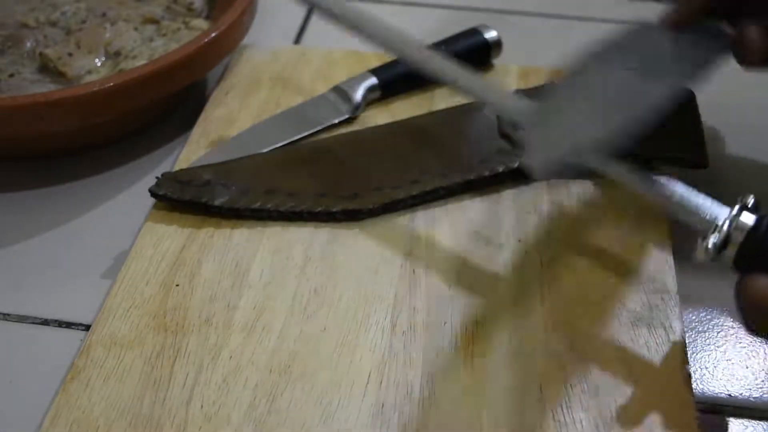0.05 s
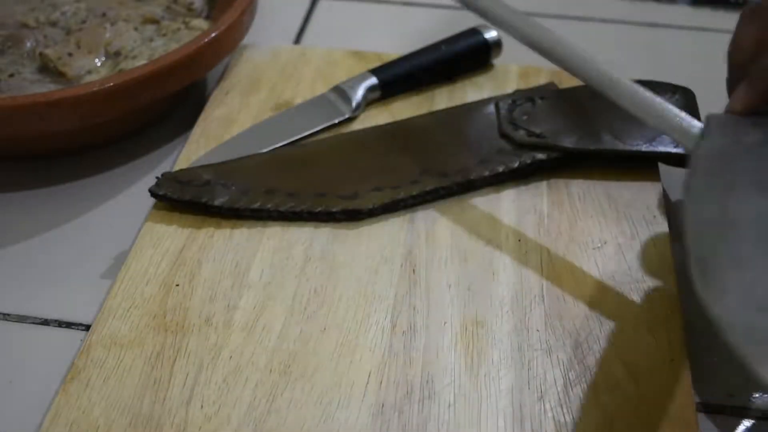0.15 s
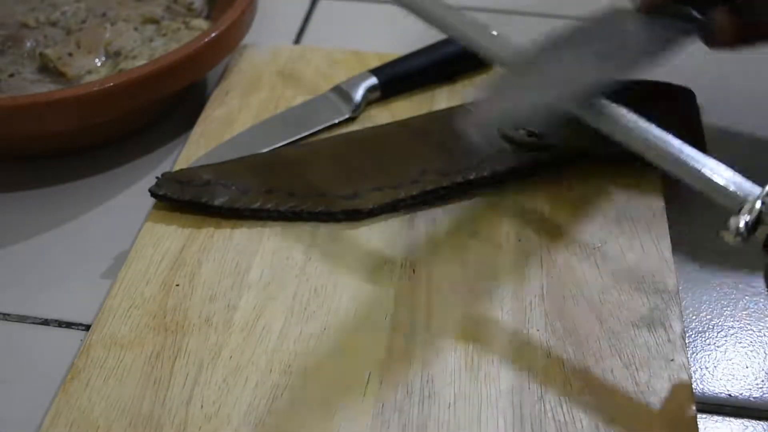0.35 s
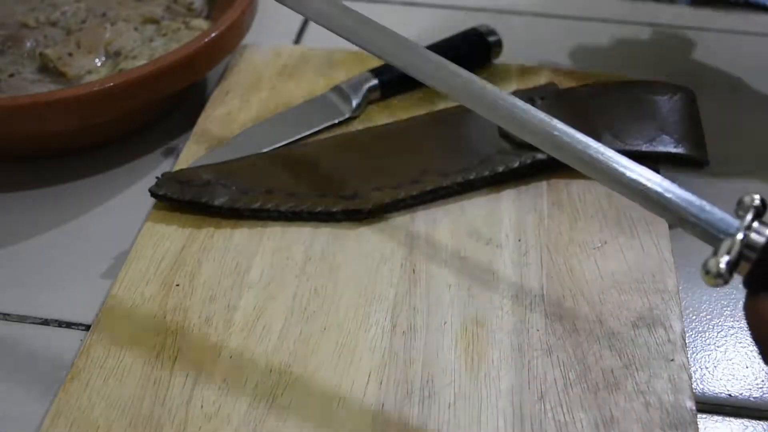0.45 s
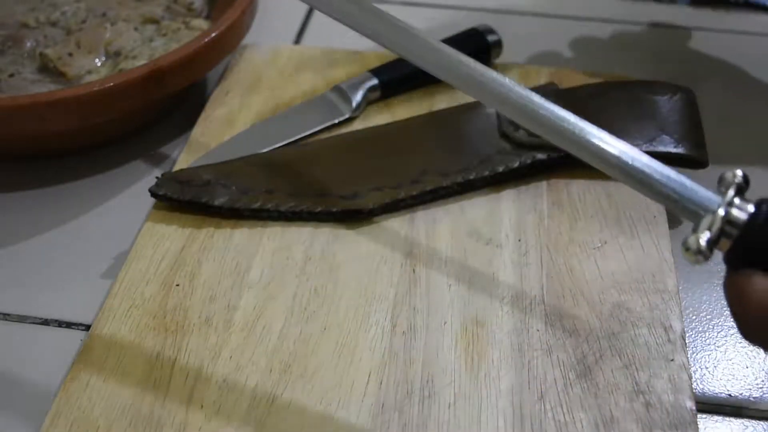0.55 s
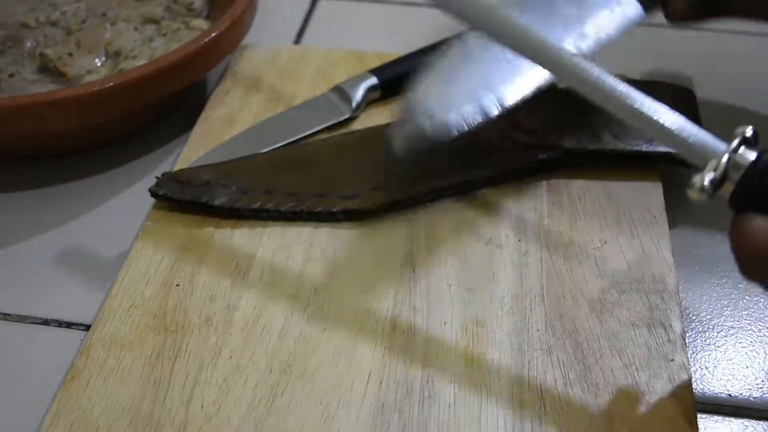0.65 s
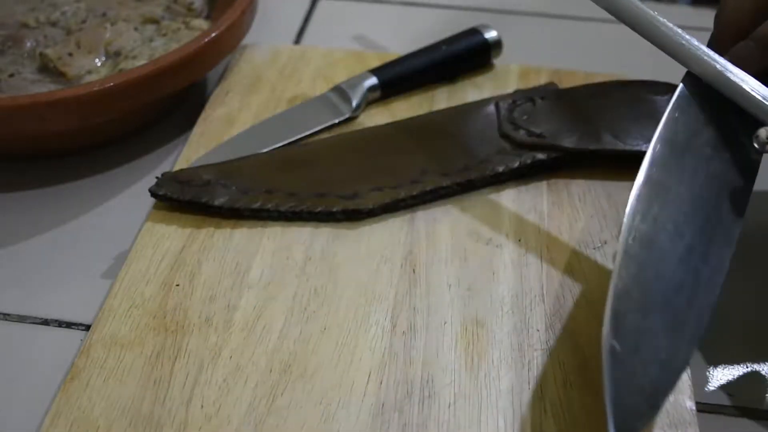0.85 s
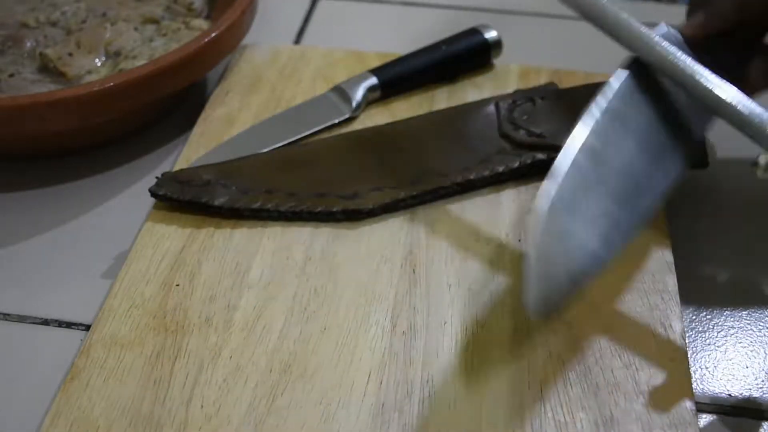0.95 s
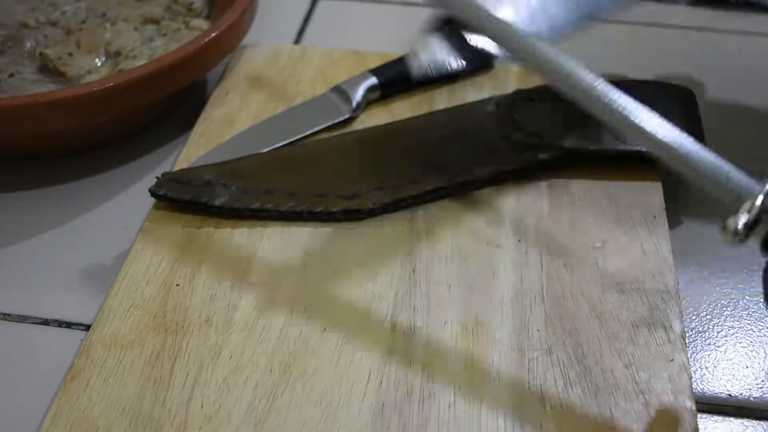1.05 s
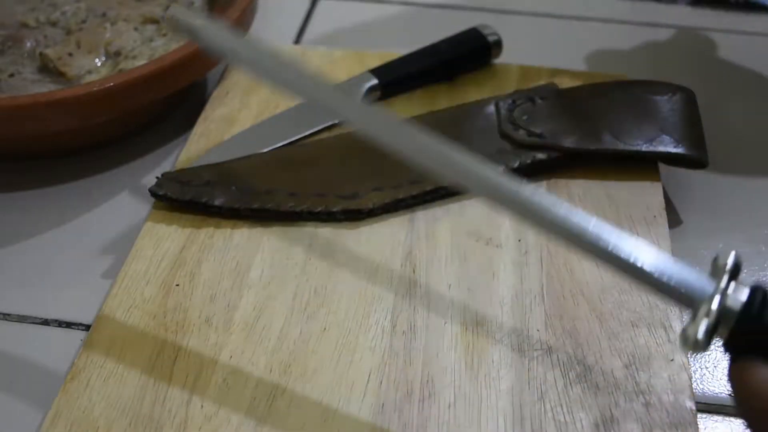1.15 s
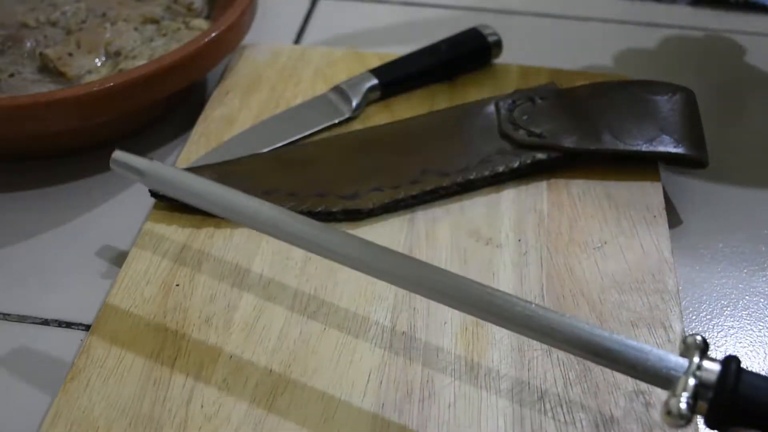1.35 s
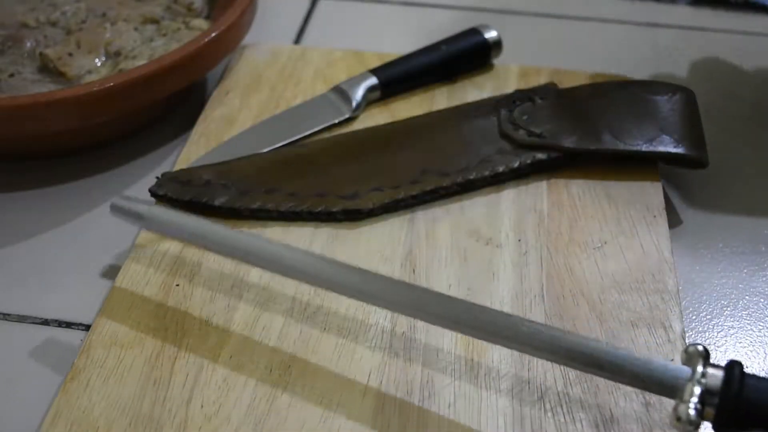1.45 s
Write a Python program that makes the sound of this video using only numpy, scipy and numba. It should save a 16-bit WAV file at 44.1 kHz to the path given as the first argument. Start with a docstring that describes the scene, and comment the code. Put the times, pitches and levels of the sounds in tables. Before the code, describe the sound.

A knife is honed on a steel, close up in a quiet kitchen. An earlier stroke's ring is fading as a clink comes at 0.2 seconds, followed by a loud, gritty metallic scrape until 0.5 and a brief ring. A second clink at 0.9 seconds leads into a lighter scrape, ringing off from about 1.1. Hard walls add a short echo over faint hiss and low hum.

```python
"""A large knife is drawn twice along a honing steel, close up in a quiet kitchen.
Each stroke lands with a clink, then the edge grinds from heel to tip: the resonances of blade and rod
slide as the contact travels. The freed blade rings on briefly, and hard walls echo it.
The harder first stroke overloads and clips. Underneath are hiss, a low drone, the dying tail of an
earlier stroke and a faint tone that swells before the second clink."""
import sys
import numpy as np
from scipy import signal
from scipy.fft import rfft, irfft
from scipy.io import wavfile
from numba import njit

SR = 44100
rng = np.random.default_rng(int(sys.argv[2]) if len(sys.argv) > 2 else 0)


def put_to_file(sound):
    """Save the sound as 16-bit audio at rate SR, in the file named by the first command-line argument."""
    columns = np.atleast_2d(sound).T  # one column per channel
    safe = np.clip(columns, -1, 1)
    whole_steps = np.round(safe * 32767)
    wavfile.write(sys.argv[1], SR, whole_steps.astype(np.int16))


N = 66150
T = np.arange(N) / SR
BIN_HZ = np.arange(N // 2 + 1) * SR / N
MIDDLE, TREBLE, LOW = 0, 1, 2
LOW_BELOW_HZ, TREBLE_ABOVE_HZ = 2500, 8300


def from_db(db):
    """Decibels to gain."""
    return 10 ** (np.asarray(db) / 20)


def rms_one(x):
    """Scale to unit power."""
    return x / np.sqrt(np.mean(x ** 2) + 1e-20)


def at_hz(rows, hz, column=1):
    """Read a table column on a log-frequency axis."""
    rows = np.array(rows)
    return np.interp(np.log(hz + 1e-9), np.log(rows[:, 0]), rows[:, column])


def register(hz):
    """The register a frequency falls in."""
    return LOW if hz < LOW_BELOW_HZ else TREBLE if hz > TREBLE_ABOVE_HZ else MIDDLE


def band(x, low_hz, high_hz):
    """Gentle band-pass."""
    edges = [low_hz, min(high_hz, SR / 2 - 1000)]
    return signal.sosfilt(signal.butter(2, edges, "band", fs=SR, output="sos"), x)


def drift(rate_hz):
    """Smooth random movement with a spread of 1."""
    return rms_one(irfft(rfft(rng.standard_normal(N)) / (1 + (BIN_HZ / rate_hz) ** 2), N))


@njit
def resonate(x, hz, width_hz):
    """A resonance with a moving centre; white noise keeps its power."""
    out, state, decay = np.zeros(len(x)), 0j, np.exp(-np.pi * width_hz / SR)
    for i in range(len(x)):
        state = state * decay * np.exp(2j * np.pi * hz[i] / SR) + x[i]
        out[i] = state.real
    return out * np.sqrt(2 * (1 - decay * decay))


def mode(x, hz, width_hz, skirt=1.102):
    """One resonance with its far skirts trimmed."""
    return band(resonate(x, hz, width_hz), hz.min() / skirt - width_hz, hz.max() * skirt + width_hz)


def wavering_tone(hz, width_hz):
    """Noise narrowed to an unsteady pitch, at unit power."""
    return rms_one(mode(rng.standard_normal(N), np.full(N, float(hz)), width_hz))


# The colour of the room tone. Each row: frequency in Hz, relative level in dB.
HISS_SPECTRUM = [(25, -32.5), (60, -11.5), (110, -5), (160, -7), (250, -5), (380, -12.5), (750, -11.5),
                 (1100, -11.5), (1550, -3.5), (2100, -9), (2600, -19), (3400, -22), (3830, -4), (4400, -24),
                 (5400, -17), (6100, -28.5), (7500, -21.5), (9000, -33), (11000, -36), (16000, -39)]
# The pitches of the drone. Each row: frequency in Hz, width in Hz, level in dB.
DRONE_TONES = [(142.7, 10, -45.5), (185, 6.4, -45.5), (240.6, 12, -52.5)]


def room_tone(hiss_db=-36):
    """A bed of faint, steady hiss and low drone."""
    hiss = rms_one(irfft(rfft(rng.standard_normal(N)) * from_db(at_hz(HISS_SPECTRUM, BIN_HZ)), N))
    drone = sum(from_db(db) * wavering_tone(hz, width) for hz, width, db in DRONE_TONES)
    return from_db(hiss_db) * hiss + drone


def earlier_stroke(sound, sooner_s=0.64, db=-3):
    """A stroke like the first, only sooner, is still dying away as the scene opens."""
    second_touch = STROKES[1][0]
    tail = sound[int(sooner_s * SR):int(second_touch * SR) - 1]
    fade = np.sqrt(np.linspace(1, 0, len(tail)))
    return from_db(db) * np.pad(tail * fade, (0, N - len(tail)))


def grains(per_s=7000, spread_db=3.5):
    """Tiny catches of the edge on the ridges of the steel."""
    sizes = from_db(spread_db * np.minimum(rng.exponential(1, N), 5))
    signs = rng.choice([-1, 1], N)
    return rms_one(sizes * signs * (rng.random(N) < per_s / SR))


# The two strokes. Each row: touch, slide start and tip release in seconds; middle, treble and low
# clink levels in dB; free ring gain below the treble in dB; treble tilt of the scrape in dB per
# octave; free ring gain in the treble in dB.
STROKES = [(.2256, .3, .468, -12, -14, -14, 0, -5, 0), (.8942, .96, 1.13, -19, -11, -9, -9, 5, -20)]


def clinks(hz, width_hz, blow_db=-1, buzz_db=-5, t60=0.075):
    """The heel lands on the rod and drives one mode: a blow, then a quickly dying buzz."""
    out = np.zeros(N)
    blow = from_db(blow_db) * np.sqrt(SR / (2 * np.pi * width_hz))
    for touch, _, _, *clink_db in STROKES:
        push = from_db(buzz_db - 60 * np.maximum(T - touch, 0) / t60) * (T >= touch) * grains()
        push[int(touch * SR)] += rng.choice([-1, 1]) * blow
        out += push * from_db(clink_db[register(hz)])
    return out


def landing_ticks(db=-17, t60=0.054):
    """The broad tick of noise as the heel meets the rod."""
    level = sum(from_db(db - 60 * np.maximum(T - touch, 0) / t60) * (T >= touch) for touch, *_ in STROKES)
    return band(level * rng.standard_normal(N), low_hz=480, high_hz=12000)


def per_stroke(column):
    """One stroke setting, held from each touch to the next."""
    rows = np.array(STROKES)
    return rows[np.maximum(np.searchsorted(rows[:, 0], T) - 1, 0), column]


# The scrape's envelope, one list a stroke. Each row: time in seconds, middle, treble and low level in dB.
SCRAPE_ENVELOPES = [
    [(.226, -71, -60, -42), (.27, -41, -48.5, -36), (.29, -30, -36.5, -35.5), (.32, -21.5, -33.5, -21.5),
     (.338, -23.5, -37, -27), (.35, -11.5, -26, -18), (.392, -7.5, -25, -21), (.42, -8.5, -23, -19),
     (.44, -7, -18.5, -25), (.464, -13.5, -10.5, -34), (.476, -11.5, -17, -39), (.49, -44, -48, -35)],
    [(.895, -42, -45, -34), (.914, -34, -61, -27), (.936, -29.5, -29, -28.5), (.952, -31.5, -38, -28),
     (.98, -31.5, -30, -36), (1.002, -24, -29.5, -27), (1.022, -19, -31, -22.5), (1.044, -14.5, -25, -24.5),
     (1.062, -16, -23.5, -24), (1.096, -14.5, -21.5, -19), (1.112, -12, -16, -27),
     (1.128, -17, -12.5, -28.5), (1.138, -32, -31, -26)],
]
# The edge catches and bites harder. Each row: centre in seconds, length in seconds, boost in dB.
EDGE_BITES = [(.3215, 0.0071, 4.5), (.351, 0.0025, 2.5), (.368, 0.0095, 1), (.384, 0.0048, 2),
              (1.096, 0.015, 1.5)]


def scrape_level(hz, treble_pivot_hz=10500):
    """How hard the edge grinds in this register; bites lift the middle, each stroke tilts the treble."""
    part = register(hz)
    level = np.zeros(N)
    for rows in map(np.array, SCRAPE_ENVELOPES):
        level += from_db(np.interp(T, rows[:, 0], rows[:, 1 + part], left=-np.inf, right=-np.inf))
    if part == MIDDLE:
        bite_db = sum(db * np.exp(-(2 * (T - centre) / length) ** 2) for centre, length, db in EDGE_BITES)
        level *= from_db(bite_db)
    if part == TREBLE:
        db_per_octave = per_stroke(column=7)
        level *= from_db(db_per_octave * np.log2(hz / treble_pivot_hz))
    return level


# The modes of blade and rod pressed together. Each row: pitch at the heel and at the tip in Hz,
# width in Hz, gain at the heel, at the tip and in the clink in dB.
CONTACT_MODES = [(997, 1057, 80, -8, -11, -16.5), (1319, 1350, 100, -8.5, -19, -7.5),
                 (1506, 1804, 98, -5, 0, -5.5), (1850, 2000, 150, -13.5, -5, -10.5),
                 (2755, 2600, 43, -10.5, -26, -10.5), (3155, 3370, 183, -12, -8.5, -11.5),
                 (3770, 3950, 146, -5, -10, -1.5), (3980, 4300, 140, -12, -6.5, -9),
                 (5150, 5300, 90, -5, -9, -11), (5330, 5600, 73.5, -4, -7, -3.5),
                 (6615, 6690, 120, -13.5, -10, -11.5), (7430, 7520, 220, -15, -10, -13.5),
                 (8860, 8780, 130, -1.5, -9, -16), (9950, 9880, 190, -11.5, -2, -19),
                 (10280, 10350, 230, -3, -12, -6), (12080, 12020, 177, -5.5, -2, -9.5),
                 (14400, 14330, 230, -12.5, -11, -25)]


def blade_on_rod(friction, wander=0.006, flicker_db=3):
    """Clinks and friction ring modes that slide with the contact; each flares and sinks on its own."""
    start, release = per_stroke(column=1), per_stroke(column=2)
    progress = np.clip((T - start) / (release - start), 0, 1)
    place = (1 - np.cos(np.pi * progress)) / 2  # 0 at the heel, 1 at the tip
    out = np.zeros(N)
    for heel_hz, tip_hz, width, heel_db, tip_db, clink_db in CONTACT_MODES:
        hz = (heel_hz + (tip_hz - heel_hz) * place) * (1 + wander * drift(rate_hz=30))
        gain = from_db(heel_db + (tip_db - heel_db) * place + flicker_db * drift(rate_hz=34))
        scrape = friction * gain * scrape_level(heel_hz)
        clink = from_db(clink_db) * clinks(heel_hz, width)
        out += mode(scrape + clink, hz, width)
    return out


# The bands of the rasp. Each row: low edge in Hz, high edge in Hz, gain in dB.
RASP_BANDS = [(640, 2660, -10), (2630, 7400, -12.5), (9200, 11000, -12)]


def edge_rasp(friction):
    """The dry, unpitched grit of the edge on the steel."""
    return sum(from_db(db) * scrape_level(np.sqrt(low * high)) * rms_one(band(friction, low, high))
               for low, high, db in RASP_BANDS)


# The kitchen's reverb. Each row: frequency in Hz, time to fall 60 dB in seconds, level in dB.
KITCHEN_REVERB = [(700, .6, -10), (1700, .8, -7), (4500, .57, -6), (7000, .5, -5.5), (8300, .42, -10),
                  (9700, .32, -17), (15000, .3, -15)]


def kitchen_echo(x, predelay_s=0.0047):
    """Diffuse echo off hard walls, dying sooner in the treble."""
    edges_hz, response = np.geomspace(300, 18000, 25), np.zeros(N)
    for low, high in zip(edges_hz, edges_hz[1:]):
        hz = np.sqrt(low * high)
        t60, db = at_hz(KITCHEN_REVERB, hz), at_hz(KITCHEN_REVERB, hz, column=2)
        fade = from_db(-60 * T / t60) * (T > predelay_s)
        tail = band(rng.standard_normal(N) * fade, low, high)
        response += from_db(db) * tail / np.sqrt(np.sum(fade ** 2))
    return signal.fftconvolve(x, response)[:N]


# The free blade's partials. Each row: pitch in Hz, level in dB, time to fall 60 dB in seconds.
BLADE_PARTIALS = [(4135, -28, .55), (4315, -23, .52), (5216, -29, .42), (5440, -28, .6), (5585, -27, .45),
                  (6645, -26, .33), (7400, -27, .22), (9805, -24, .3), (11655, -28, .28), (12050, -35, .26),
                  (13680, -46, .33), (14300, -46, .3)]


def free_ring(build_s=0.02, waver_db=3):
    """The tip slips off the rod and leaves the blade ringing with a fast shimmer."""
    out = np.zeros(N)
    for _, _, release, *_, ring_db, _, treble_db in STROKES:
        build = np.exp(np.minimum(T - release, 0) / build_s)
        age = np.maximum(T - release, 0)
        for hz, db, t60 in BLADE_PARTIALS:
            start_db = db + (treble_db if hz > TREBLE_ABOVE_HZ else ring_db)
            level_db = start_db - 60 * age / t60 + waver_db * drift(rate_hz=140)
            out += build * from_db(level_db) * np.sqrt(2) * np.sin(2 * np.pi * (hz * T + rng.random()))
    return out


def faint_tone(centre_s=0.8, length_s=0.3, db=-40.5):
    """A narrow, wavering tone swells before the second touch and fades."""
    swell = np.exp(-(2 * (T - centre_s) / length_s) ** 2)
    return from_db(db) * swell * wavering_tone(hz=991, width_hz=20)


def scene(chatter_db=1.35):
    """The mono mix: chattering friction plays the knife, with its echo, over the room tone."""
    friction = grains() * rms_one(from_db(chatter_db * drift(rate_hz=76)))
    knife = landing_ticks() + blade_on_rod(friction) + edge_rasp(friction) + free_ring()
    honing = knife + kitchen_echo(knife)
    return (honing + earlier_stroke(honing) + faint_tone() + room_tone())[None]


def record(dry, clip_level=0.85, cutoff_hz=15700):
    """Overload clips the loudest peaks, then a steep low-pass takes off the top."""
    lowpass = signal.ellip(10, .1, 70, cutoff_hz, fs=SR, output="sos")
    return signal.sosfilt(lowpass, np.clip(dry, -clip_level, clip_level))


dry = scene()
out = record(dry)
put_to_file(out)
```